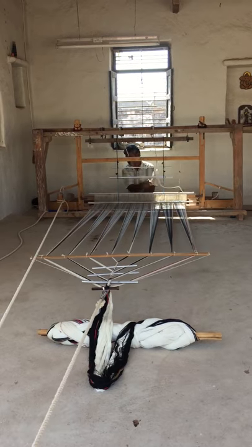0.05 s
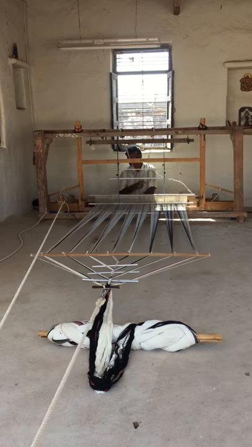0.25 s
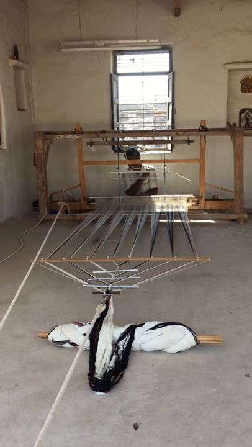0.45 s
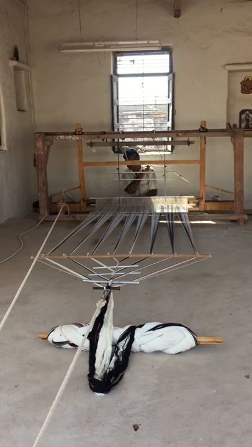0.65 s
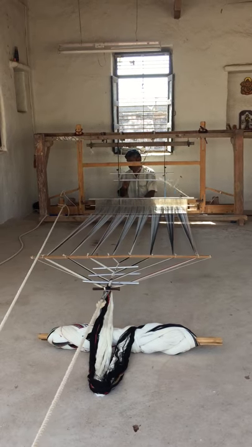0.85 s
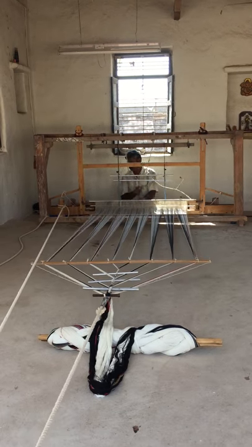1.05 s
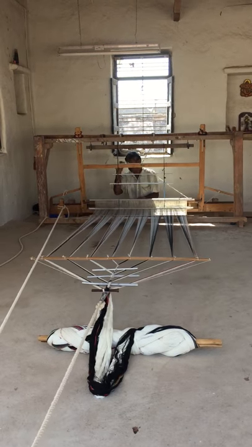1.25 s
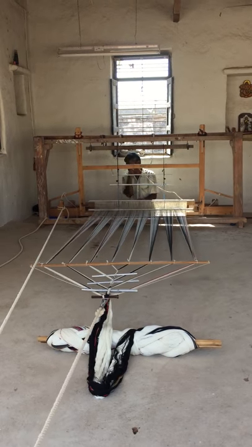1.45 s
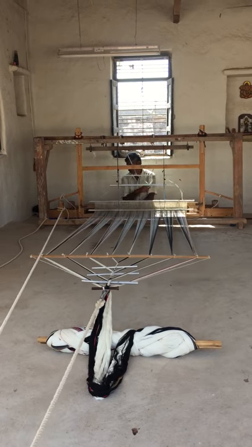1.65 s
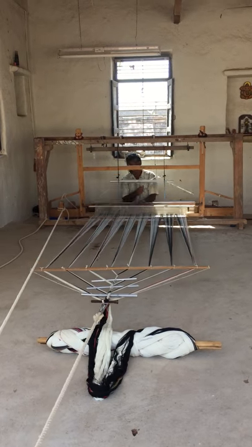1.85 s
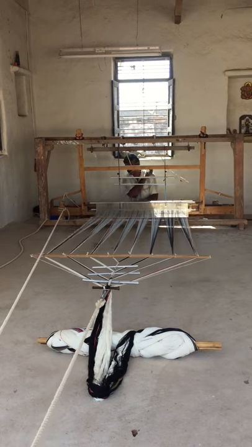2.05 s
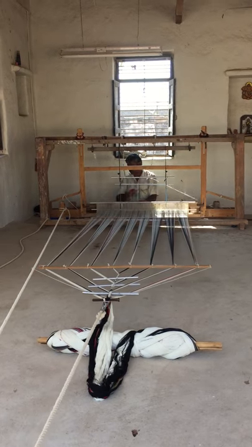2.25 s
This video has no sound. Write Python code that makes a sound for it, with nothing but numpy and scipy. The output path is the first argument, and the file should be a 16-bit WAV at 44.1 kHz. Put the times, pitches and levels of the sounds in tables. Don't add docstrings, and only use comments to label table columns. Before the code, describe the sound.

A wooden handloom clacks steadily, beater and shuttle knocking hard in a bare echoing room

```python
import sys
import numpy as np
from scipy import signal
from scipy.fft import rfft, irfft, next_fast_len
from scipy.io import wavfile
from scipy.ndimage import uniform_filter1d

SR = 44100
rng = np.random.default_rng(int(sys.argv[2]) if len(sys.argv) > 2 else 0)


def magnitude_from_level(level_db):
    exponent = np.asarray(level_db, float) / 20
    return 10 ** exponent


def output_pcm(signal):
    pcm = np.clip(np.atleast_2d(signal).T, -1, 1) * 32767
    wavfile.write(sys.argv[1], SR, np.round(pcm).astype(np.int16))


N = 101429
SPAN = 2 ** 15
HZ = np.fft.rfftfreq(SPAN, 1 / SR)
TIME_S = np.arange(N) / SR
WET_DB = 7
SMEAR_T60_S = 0.038


def along(points, hz):
    point_hz, value = np.transpose(points)
    return np.interp(np.log(hz + 1), np.log(point_hz + 1), value)


def causal(gain):
    cepstrum = irfft(np.log(gain + 1e-6))
    half = cepstrum.shape[-1] // 2
    folded = np.concatenate([cepstrum[..., :1], 2 * cepstrum[..., 1:half]], -1)
    return np.exp(rfft(folded, 2 * half))


def peak(centre_hz, width_hz):
    damping = 1j * HZ * width_hz
    return damping / (centre_hz ** 2 - HZ ** 2 + damping + 1e-9)


def coloured(x, spectrum):
    size = 2 * next_fast_len(N // 2 + SR)
    gain = magnitude_from_level(along(spectrum, np.fft.rfftfreq(size, 1 / SR)))
    y = irfft(rfft(x, size) * causal(gain), size)[:N]
    return y / y.std()


def unit_energy(x):
    return x / np.linalg.norm(x, axis=1, keepdims=True)


# pitch_hz [Hz], t60_s [s to fall 60 dB]
ROOM_DECAY = [(100, 0.12), (400, 0.45), (1000, 0.38), (2500, 0.34), (6000, 0.29), (13000, 0.21)]


def paths(wet_db, chatter_s, smear_t60_s=SMEAR_T60_S):
    fills_s, rise_s, lumps_per_s, scatter_db = 0.0084, 0.003, 371, 4
    noise = rng.standard_normal((len(wet_db), SPAN // 2 + SPAN // 4))
    hz, t, bands = signal.stft(noise, SR, nperseg=256)
    decay = magnitude_from_level(-60 * t / along(ROOM_DECAY, hz)[:, None])
    tail = signal.istft(bands * decay, SR, nperseg=256)[1]

    t = np.arange(tail.shape[1]) / SR
    hold_s = chatter_s[:, None]
    knots = rng.standard_normal((len(wet_db), 512))
    lumps_db = scatter_db * np.array([np.interp(t * lumps_per_s, np.arange(len(k)), k) for k in knots])
    fall_db = 60 * np.maximum(t - hold_s, 0) / smear_t60_s
    near = rng.standard_normal(tail.shape) * magnitude_from_level(lumps_db - fall_db) * np.minimum(t / rise_s, 1)
    room = tail * (1 - np.exp(-t / (fills_s + hold_s)))
    return rfft(unit_energy(near) + magnitude_from_level(WET_DB + wet_db)[:, None] * unit_energy(room), SPAN)


def strike(start_s, level_db, wet_db, body, clean=0, smear_t60_s=SMEAR_T60_S):
    lead_s = 0.002
    chatter_s = 0.014 * magnitude_from_level(0.6 * level_db)
    sound = irfft(body * (clean + paths(wet_db, chatter_s, smear_t60_s)), SPAN)
    loudest = np.sqrt(uniform_filter1d(sound ** 2, 512).max(1, keepdims=True))
    out = np.zeros(N + SPAN)
    for s, db, x in zip(start_s, level_db, sound / loudest):
        first = max(round((s - lead_s) * SR), 0)
        out[first:][:SPAN] += magnitude_from_level(db) * x
    return out[:N]


def blows(rows, gain_db, contact_s, cycles):
    peak_s, level_db, pitch_hz = np.transpose(rows)[:, :, None]
    rise_s = contact_s + cycles / pitch_hz
    phase = 2 * np.pi * rng.random(peak_s.shape)
    u = np.clip((TIME_S - peak_s) / rise_s + 1, 0, 12)
    swell = (u * np.exp(1 - u)) ** 2
    ring = np.sin(2 * np.pi * pitch_hz * rise_s * u + phase)
    return (magnitude_from_level(level_db + gain_db) * swell * ring).sum(0)


# pitch_hz [Hz], level_db [dB]
AIR_COLOUR = [(120, -21), (200, -28), (967, -31), (1640, 26), (2520, -32), (3000, 15), (12000, -33),
              (15600, -63), (22000, -120)]


def room_tone():
    return magnitude_from_level(-62.5) * coloured(rng.standard_normal(N), AIR_COLOUR)


# start_s [s], level_db [dB], pitch_hz [Hz]
TREADLE_THUDS = [(0.0, -35.5, 222), (0.247, -32.5, 306), (0.36, -32, 380), (0.428, -24, 190),
                 (0.68, -39, 238), (0.892, -32, 335), (0.956, -38, 303), (1.162, -25.5, 333),
                 (1.27, -42, 400), (1.435, -34.5, 209), (1.685, -33, 337), (1.722, -32.5, 335),
                 (1.831, -29.5, 352), (1.911, -25.5, 170), (2.169, -36.5, 252)]


def thuds():
    start_s, level_db, pitch_hz = np.transpose(TREADLE_THUDS)
    body = peak(pitch_hz[:, None], 0.6 * pitch_hz[:, None]) ** 2
    return strike(start_s, level_db - 6, 0 * start_s, body)


# time_s [s], level_db [dB]
ROCKING_LEVEL = [(0.0, -45.5), (0.17, -57), (0.31, -50.5), (0.7, -51.5), (0.86, -69.5), (0.94, -45.5),
                 (1.13, -66), (1.18, -70), (1.22, -69), (1.3, -47), (1.53, -53), (1.55, -61), (1.96, -43.5),
                 (2.12, -55), (2.15, -49), (2.3, -52)]
# pitch_hz [Hz], level_db [dB]
ROCKING_COLOUR = [(12, -51), (20, -25), (58, -3), (135, -4.5), (178, -6.5), (200, 1.5), (260, -18),
                  (440, -120)]


def rocking():
    level_db = np.interp(TIME_S, *np.transpose(ROCKING_LEVEL)) + 1.5
    return coloured(rng.standard_normal(N), ROCKING_COLOUR) * magnitude_from_level(level_db)


# time_s [s], level_db [dB]
RUBBING_LEVEL = [(0, -37), (.08, -43), (.25, -30), (.33, -32), (.4, -23.5), (.62, -35), (.72, -32),
                 (.82, -44.5), (.99, -37), (1.12, -33), (1.3, -29), (1.42, -36), (1.54, -52.5), (1.64, -32),
                 (1.74, -55), (1.82, -29.5), (2.15, -31.5), (2.3, -48)]
# pitch_hz [Hz], level_db [dB]
RUBBING_COLOUR = [(120, -42), (200, -4), (370, -8), (1000, 2), (2200, -5), (3500, -10.5), (10000, -24.5),
                  (17000, -42)]


def slide():
    grains_per_s, grain_spread_db = 1100, 3
    luck = rng.random((2, N))
    size = magnitude_from_level(-grain_spread_db * np.log(1 - luck[1]))
    grains = (luck[0] < grains_per_s / SR) * size * rng.standard_normal(N)
    level_db = np.interp(TIME_S, *np.transpose(RUBBING_LEVEL)) - 6.5 - WET_DB
    x = coloured(grains, RUBBING_COLOUR) * magnitude_from_level(level_db)
    before = 2 ** 13
    room = irfft(paths(np.array([-3]), np.zeros(1))[0])
    return signal.fftconvolve(np.r_[x[before:0:-1], x], room)[before:][:N]


# start_s [s], level_db [dB], room_share_db [dB], tilt_db [dB per octave]
BRIGHT_CRACKS = [(0.066, -39, -5, 3), (0.0928, -31.5, -1, 7.5), (0.1008, -25.5, -4, -3),
                 (0.1862, -33, -1, -3), (0.2159, -20.5, -1, 0), (0.2447, -24.5, -16, -4),
                 (0.388, -26.5, -21, -5), (0.4323, -11, 3, 0.5), (0.4546, -12, -3.5, 0),
                 (0.6389, -27, 8, -11), (0.7373, -20.5, -8, -10), (0.8236, -34, 11, -9.5),
                 (0.879, -17, -6.5, -5), (0.9458, -13.5, 6, -2.5), (0.956, -11.5, -7, 3),
                 (1.1631, -8.5, -0.5, 0.5), (1.2558, -15, 1, -7.5), (1.3186, -21.5, 4, -4),
                 (1.3978, -30.5, -8, -4.5), (1.543, -46.5, 7, 8), (1.575, -27.5, -3, -1.5),
                 (1.6704, -35, 3, -1), (1.702, -22.5, 3, -2.5), (1.716, -20.5, -5.5, -1),
                 (1.827, -37.5, 9, 7), (1.8727, -28, -0.5, -2.5), (1.917, -10, 1, 0),
                 (1.9375, -9.5, -3, -5), (2.1641, -26, -4.5, -8.5), (2.228, -25.5, -7.5, -10.5)]
# pitch_hz [Hz], level_db [dB]
CRACK_COLOUR = [(100, -86), (700, -28), (1300, -8), (2800, -4), (5500, -7.5), (12000, -14), (17500, -23.5)]


def cracks():
    start_s, level_db, wet_db, tilt_db = np.transpose(BRIGHT_CRACKS)
    low_hz, high_hz, modes = 1800, 11000, 7
    modes_hz = low_hz * (high_hz / low_hz) ** rng.random((len(start_s), modes))
    rings = sum(np.abs(peak(c[:, None], 0.08 * c[:, None])) ** 2 for c in modes_hz.T)
    own = 1 + magnitude_from_level(-5) * rings
    tilt = np.clip(tilt_db, -12, 4)[:, None] * np.log2(HZ / 4000 + 0.19)
    body = causal(own * magnitude_from_level(along(CRACK_COLOUR, HZ) + tilt))
    return strike(start_s + 0.0015, level_db - 10, wet_db, body, clean=0.38, smear_t60_s=0.033)


# start_s [s], level_db [dB], room_share_db [dB], pitch_hz [Hz]
HOLLOW_KNOCKS = [(0.092, -24, 11, 1290), (0.187, -20, -8.5, 1120), (0.215, -18.5, 6, 1250),
                 (0.247, -23.5, -11, 1090), (0.344, -18.5, -12, 940), (0.356, -16, -8.5, 1070),
                 (0.427, -4.5, -2, 1190), (0.455, -7.5, -5.5, 1770), (0.474, -7, -16, 1440),
                 (0.64, -42, -4, 999), (0.653, -27, -2, 1070), (0.822, -28.5, 5, 1470),
                 (0.863, -21.5, -5, 1120), (0.879, -15, -2, 1100), (0.955, -9.5, 0, 1470),
                 (1.154, -15, 5, 690), (1.166, -5.5, -3.5, 1260), (1.189, -16.5, -7, 1060),
                 (1.209, -19, -6, 960), (1.569, -23, 3, 1410), (1.674, -21, -4.5, 1030),
                 (1.692, -19, 2, 1080), (1.719, -17.5, 2, 1040), (1.751, -28, -17, 1070),
                 (1.826, -16.5, -3.5, 1030), (1.852, -17.5, -13, 880), (1.910, -4.5, -6.5, 1110),
                 (1.939, -5, 3.5, 1320), (2.119, -28.5, 12, 980), (2.199, -24, 1, 1240)]
# pitch_hz [Hz], width_hz [Hz], level_db [dB]
TIMBER_RINGS = [(196, 5.7, 19.5), (606, 54, 4.5), (870, 36, -0.5), (970, 57, 0.5), (1234, 28, -18),
                (1499, 19, -2), (1690, 82, -16), (2265, 23, 7), (2820, 42, 4.5), (3594, 113, 12)]


def knocks():
    start_s, level_db, wet_db, pitch_hz = np.transpose(HOLLOW_KNOCKS)
    timber = 1 + magnitude_from_level(0.5) * sum(magnitude_from_level(db) * peak(hz, width) for hz, width, db in TIMBER_RINGS)
    bump = peak(pitch_hz[:, None], pitch_hz[:, None]) ** 2
    dull = (1 + 1j * HZ / 3000) ** 2
    belly = magnitude_from_level(-8) * peak(371, 138) ** 2
    return strike(start_s, level_db - 11.5, wet_db, bump * timber / dull + belly, clean=0.32)


# peak_s [s], level_db [dB], pitch_hz [Hz]
FLOOR_BOOMS = [
    (.25, -44, 66),
    (.33, -40, 65.6),
    (.375, -42.5, 68),
    (.67, -54, 68),
    (.94, -44.5, 72),
    (1.18, -31.5, 186),
    (1.25, -40.5, 170),
    (1.45, -38.5, 158),
    (2.01, -56, 70),
    (2.17, -49, 65),
]


def booms():
    return blows(FLOOR_BOOMS, 0, 0, 2.17)


# peak_s [s], level_db [dB], pitch_hz [Hz]
BEATER_NOTES = [(0.346, -21.5, 1240), (.434, -17, 557), (.447, -14, 580), (.462, -20, 546),
                (.882, -19, 2010), (1.171, -19, 2190), (1.184, -17, 2280), (1.2, -14.5, 2100),
                (1.303, -26, 3000), (1.328, -22, 3320), (1.829, -19.5, 1480), (1.914, -15, 570),
                (1.94, -17, 586), (1.99, -15.5, 3740)]
# peak_s [s], level_db [dB], pitch_hz [Hz]
REBOUND_BLOWS = [(0.3741, -19.5, 910), (0.4299, -13, 1240), (0.4407, -8, 1220), (0.4477, -22, 1290),
                 (0.4509, -21, 3400), (0.4575, -5, 1370), (0.4608, -23, 2800), (0.469, -27, 3060),
                 (0.4743, -12, 1280), (0.4792, -14, 2450), (0.4834, -12, 1180), (0.4887, -23, 1080),
                 (0.4969, -27, 1460), (0.5064, -30, 1180), (0.9615, -12.5, 3030), (0.9633, -24, 1450),
                 (0.9706, -18, 3110), (0.9719, -14, 1686), (0.9792, -18, 1600), (0.9856, -22, 1170),
                 (0.9971, -21, 1600), (1.1631, -17, 1280), (1.1679, -19, 3180), (1.1728, -11, 1160),
                 (1.1789, -19, 1300), (1.1861, -24, 3020), (1.193, -11, 1340), (1.2007, -14, 990),
                 (1.21, -13, 1060), (1.2215, -13, 1050), (1.2311, -21, 1310), (1.2406, -21, 1400),
                 (1.2553, -19, 1060), (1.2654, -17, 3180), (1.2832, -21, 3010), (1.2897, -18.5, 2900),
                 (1.7299, -30, 1020), (1.8315, -22, 1000), (1.8531, -19.5, 940), (1.8618, -20, 910),
                 (1.913, -15, 1160), (1.9198, -19, 1110), (1.9259, -13, 1270), (1.9281, -11.5, 2720),
                 (1.9419, -22, 2710), (1.9422, -32, 1370), (1.9473, -14, 3600), (1.9483, -30, 1250),
                 (1.958, -27, 3130), (1.961, -11, 1025), (1.9667, -27, 3000), (1.9687, -20, 1290),
                 (1.9881, -28, 3080), (1.9904, -26, 1230), (2.0002, -28, 1120), (2.003, -17, 3180),
                 (2.0086, -27, 1070), (2.0161, -20, 1230)]


def rebounds():
    return blows(REBOUND_BLOWS + BEATER_NOTES, -2, 0.0012, 1.3)


# start_s [s], level_db [dB]
TIP_HITS = [
    (1.256, -15.5),
    (1.284, -22.5),
]
# pitch_hz [Hz], level_db [dB], t60_s [s to fall 60 dB]
TIP_STEEL = [(2964, 9, 0.04), (3030, -6, 0.062), (4500, 3, 0.027), (6120, -4, 0.02)]


def tip():
    start_s, level_db = np.transpose(TIP_HITS)
    body = sum(magnitude_from_level(db) * peak(hz, np.log(1000) / np.pi / t60_s) for hz, db, t60_s in TIP_STEEL)
    return strike(start_s, level_db - 10.5, 0 * start_s - 5, body)


def scene():
    low = thuds() + rocking() + booms()
    wood = slide() + cracks() + knocks() + rebounds()
    return (room_tone() + low + wood + tip())[None]


def band_limit(x):
    return signal.sosfilt(signal.butter(12, 18010, fs=SR, output="sos"), x)


def record(dry):
    heard = np.fft.rfftfreq(2 * N, 1 / SR) < 17350
    limited = irfft(rfft(dry, 2 * N) * heard)[:, :N]
    return band_limit(limited)


dry = scene()
out = record(dry)
output_pcm(out)
```